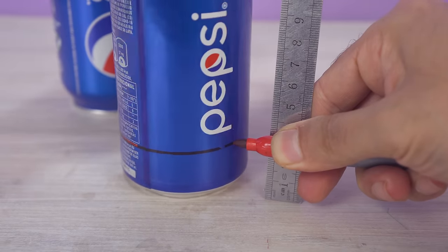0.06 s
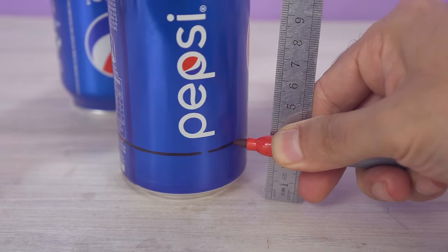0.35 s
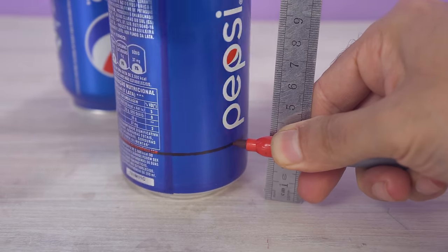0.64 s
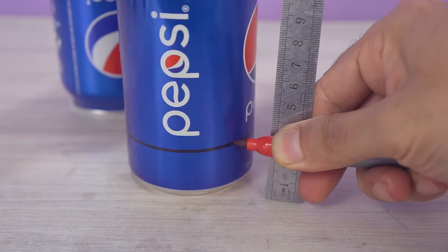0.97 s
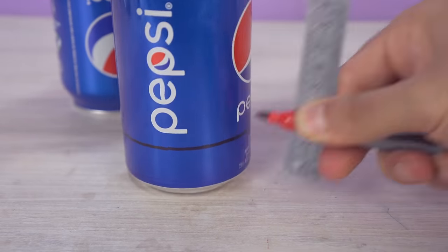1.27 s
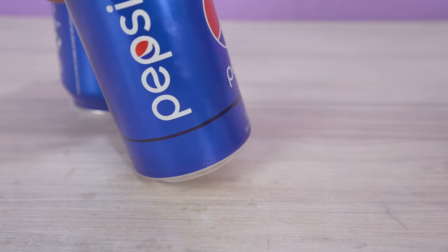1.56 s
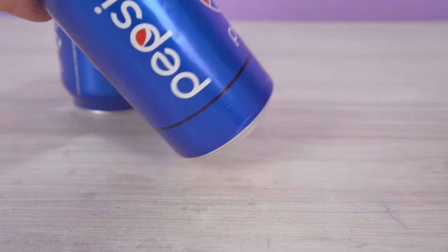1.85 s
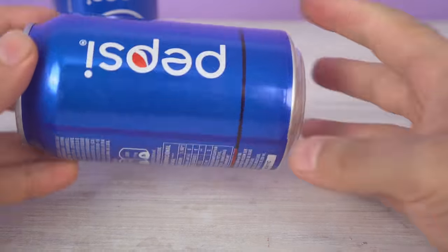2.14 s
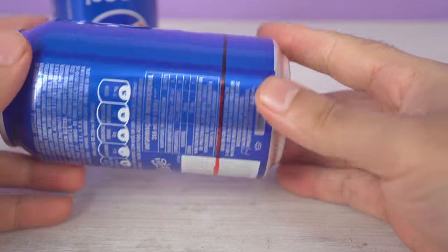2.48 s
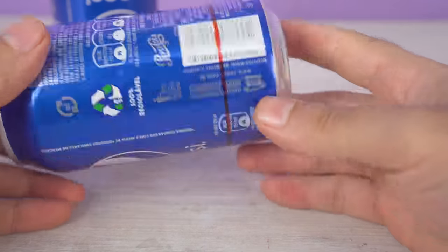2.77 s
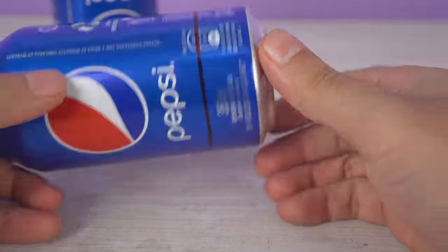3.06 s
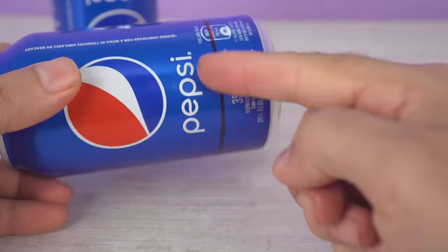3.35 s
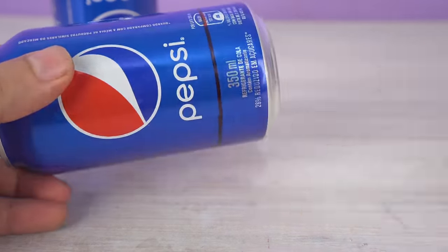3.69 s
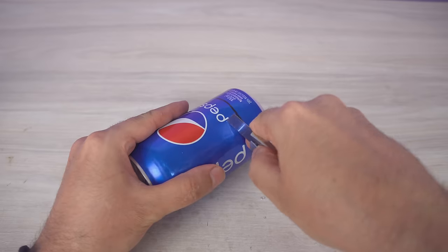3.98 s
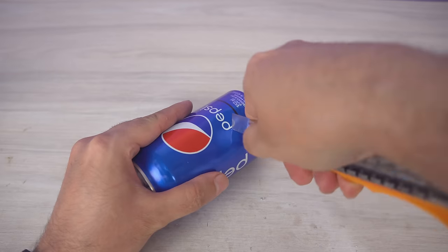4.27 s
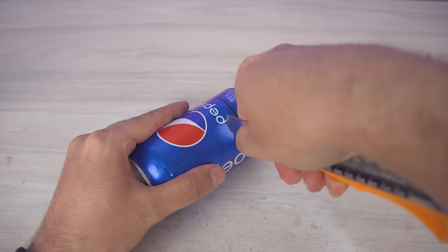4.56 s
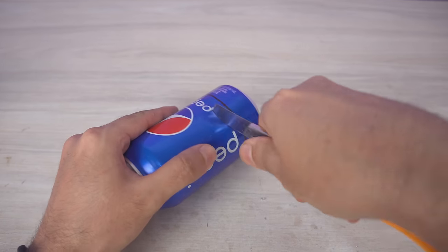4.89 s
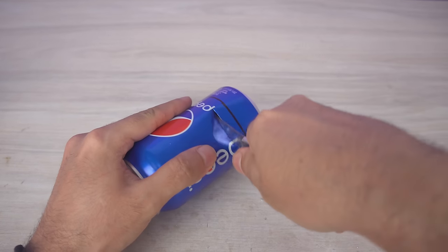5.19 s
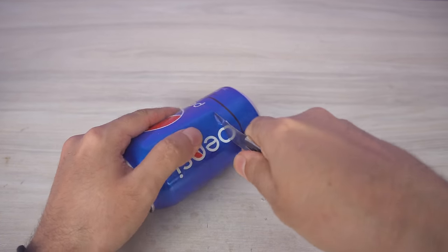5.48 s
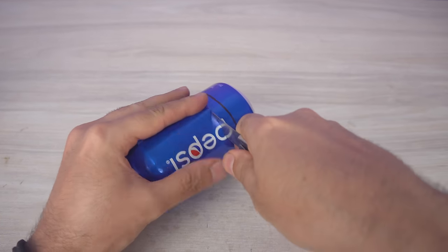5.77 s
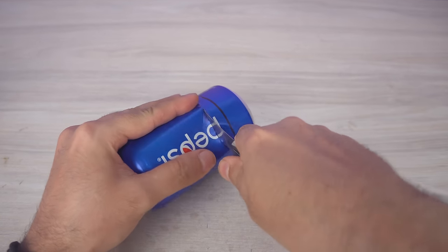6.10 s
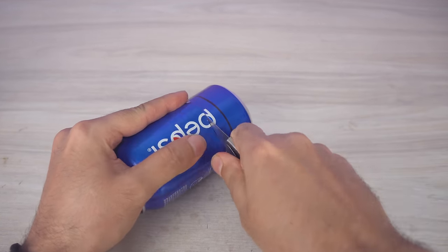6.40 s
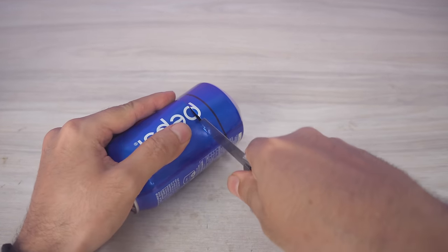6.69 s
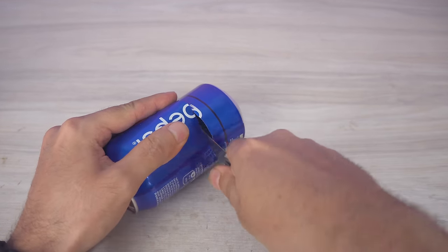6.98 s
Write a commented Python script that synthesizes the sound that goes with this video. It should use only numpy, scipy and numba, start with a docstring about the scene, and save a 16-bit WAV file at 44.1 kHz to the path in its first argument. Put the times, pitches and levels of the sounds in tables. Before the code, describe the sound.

Soft marker rubbing on a drink can, a loud crinkle, then a blade sawing through the thin metal with crackles and hollow rasps.

```python
"""Felt rubs softly on metal: an empty aluminium drink can is turned against a marker on a table.
It is lifted, and its wall buckles under the fingers with a loud crinkle. A utility knife pierces it
and saws round it: the blade judders, the thin sheet tears in sharp snaps, and the can answers with
a hollow note that rises and dulls as the slit opens. Small quiet room, heard from close by."""
import sys
import numpy as np
from scipy import signal
from scipy.fft import rfft, irfft
from scipy.io import wavfile
from scipy.ndimage import uniform_filter1d
from numba import njit

SR = 44100
rng = np.random.default_rng(int(sys.argv[2]) if len(sys.argv) > 2 else 0)


def file_out(sig):
    """Save sig as 16-bit WAV at sys.argv[1]."""
    # one column per channel
    cols = np.atleast_2d(sig).T
    # limit, then scale
    lim = np.clip(cols, -1, 1)
    pcm = np.round(lim * 32767).astype(np.int16)
    wavfile.write(sys.argv[1], SR, pcm)


N = 319284
TIME_S = np.arange(N) / SR

# twists of the can against the marker: (start [s], rise [s], hold [s], level [dB])
TWISTS = [(0.0, 0.0074, 0.012, -50), (0.16, 0.058, 0.13, -56.5), (.47, 0.12, 0.063, -50),
          (0.769, 0.027, 0.12, -49), (1.002, .03, 0.04, -55), (1.149, 0.022, 0.013, -57.5)]
# felt friction spectrum: (frequency [Hz], level [dB])
FELT_SPECTRUM = [(100, -2.5), (300, -4.5), (600, 0.5), (1100, -5), (2000, -8.5), (2600, -8.5),
                 (3100, -13.5), (3650, -13.5), (4600, -22.5), (6400, -21.5), (7300, -14.5), (8400, -28.5),
                 (11500, -29.5), (13000, -19), (16000, -31)]
# narrow high resonances colouring the rubbing and the tap: (pitch [Hz], rub gain [dB], tap level [dB])
RESONANCES = [(2470, -6, -43), (3380, 7, -56), (4360, 5.5, -76), (5370, -21, -51), (7140, -8, -54),
              (9300, -5, -63)]
# low rumble, dipping around 4.2 s: (time [s], level [dB])
RUMBLE_LEVELS = [(0, -64.5), (1.4, -62.5), (2.1, -66), (3.6, -67.5), (4.2, -82), (4.8, -67), (5.5, -66),
                 (6.1, -71), (7.24, -71.5)]
# low rumble spectrum: (frequency [Hz], level [dB])
RUMBLE_SPECTRUM = [(15, -7.5), (34, 7), (55, -6.5), (100, -9.5), (200, -15.5), (500, -51), (2000, -139)]
# finger slides: (time [s], length [s], level [dB], centre [Hz])
RUBS = [(0.02, 0.036, -48, 1860), (1.586, 0.074, -55.5, 1390), (1.96, 0.1, -55, 680),
        (2.087, .12, -62.5, 1000), (2.335, 0.062, -63, 1080), (2.641, 0.052, -56.5, 915),
        (3.517, 0.23, -66, 900), (3.907, 0.086, -56.5, 1110), (4.164, 0.096, -57.5, 1090)]
# buckles of the closed wall: (time [s], crack level [dB], treble re crack [dB])
CRINKLES = [(0.1622, -56.5, -28.5), (0.2199, -55.5, -27), (0.9934, -55, -18), (1.5771, -45.5, -1.5),
            (1.697, -27.5, 3), (1.7016, -22, -0.5), (1.728, -31, 6), (1.7343, -27, 1), (1.7585, -26, 1.5),
            (1.7878, -34, -4), (1.8541, -36.5, -7), (1.8878, -35, 1.5), (1.9734, -50, -9),
            (1.9817, -41.5, -7), (2.088, -53, -4), (2.2244, -47.5, -1.5), (2.6454, -50, -6),
            (3.3655, -68, 10), (3.523, -45.5, -5.5), (3.7902, -56.5, -7)]
# low, mid and treble bands of a click: (low edge [Hz], high edge [Hz], shimmer t60 [s])
CLICK_BANDS = [(950, 2500, 0.28), (2930, 7350, 0.17), (6430, 23300, 0.2)]
# ringing wall panels: (time [s], level [dB], pitch [Hz], t60 [s])
PANELS = [(4.898, -31, 3900, .03), (.82, -48.5, 3470, 0.13), (1.055, -52, 3360, 0.056),
          (1.6, -45, 1000, 0.095), (1.715, -36.5, 2400, 0.47), (1.728, -23, 8400, 0.16),
          (1.971, -43.5, 2600, 0.12), (3.471, -64, 7200, 1), (4.793, -36.5, 6440, 0.073),
          (4.996, -26, 5770, 0.22), (5.44, -35.5, 1950, 0.24), (6.514, -36.5, 1770, 0.29)]
# knocks through the table: (time [s], level [dB], centre [Hz], t60 [s])
THUDS = [(1.7, -43.5, 55, 0.17), (1.7, -40.5, 580, 0.4), (2.644, -55.5, 378, 0.17),
         (2.954, -50.5, 120, 0.07), (3.522, -42.5, 222, 0.019), (4.986, -36, 213, 0.014),
         (5.452, -39, 483, 0.076), (5.452, -50, 99, 0.045), (6.512, -54, 387, 0.26)]
# running buckles: (start [s], rise [s], hold [s], level [dB], tilt [dB/octave])
CRUMPLES = [(1.706, .012, 0.031, -29, -1), (4.978, 0.018, 0.022, -31.5, -3), (5.435, .006, 0.023, -32, -4),
            (6.509, .004, 0.023, -35, -5.5), (6.627, .004, 0.037, -41.5, -7)]
# crack shower spectrum before tilt: (frequency [Hz], level [dB])
CRUMPLE_SPECTRUM = [(100, -53), (300, -36), (1000, -13), (2300, -3), (5500, 4), (8500, 4.5), (12000, 2),
                    (15500, 1)]
# tears under the blade: (time [s], crack level [dB], treble re crack [dB], kick to the body [dB])
SNAPS = [(4.0191, -30.5, -12.5, -39), (4.4789, -47, -8, -34.5), (4.4844, -50, -10, -37),
         (4.6441, -52, -5, -43.5), (4.668, -48, -5, -34.5), (4.6966, -43.5, -7, -36),
         (4.7138, -59, -5, -37.5), (4.793, -32, -6, -41), (4.8985, -28.5, -12, -36),
         (4.946, -35, -17, -36.5), (4.9882, -23, -3.5, -28), (5.1206, -31, -5, -50), (5.192, -34, -12, -30),
         (5.2449, -48, -3, -34), (5.274, -33.5, -14, -30), (5.3465, -43, -16, -49), (5.3824, -40.5, 8, -54),
         (5.4361, -21, -10, -30), (5.4533, -24.5, -10, -36), (5.5397, -27.5, -21, -42.5),
         (5.5612, -34.5, -16, -32.5), (5.6391, -33.5, -3, -43.5), (5.648, -30.5, -16, -30),
         (5.6974, -29.5, -13, -39), (5.824, -48, -13, -56), (5.865, -44.5, -1, -57),
         (5.9301, -45.5, -20, -45.5), (5.943, -64, -8, -40.5), (6.0392, -27, -10, -35),
         (6.0644, -39, -4, -41), (6.071, -35, -15, -36), (6.1093, -54, -8, -39),
         (6.1501, -30.5, -18, -39.5), (6.1645, -24.5, -7, -32), (6.2148, -41.5, 5, -39),
         (6.238, -40, -11, -39), (6.3596, -43.5, 7.5, -39.5), (6.3985, -44, 9, -33.5),
         (6.4864, -56, -9, -46.5), (6.5065, -34, 8, -53), (6.5128, -28, 2.5, -38.5),
         (6.6348, -23.5, -4, -33.5), (6.69, -30, -25, -43), (6.828, -57, -17, -51.5),
         (6.9068, -43, 0.5, -31.5), (6.9644, -27.5, -17, -32.5), (6.9886, -24, -36, -32.5),
         (7.143, -52, -3, -39), (7.1561, -46.5, -24, -41), (7.1807, -35, -24, -62)]
# wall and air modes: (base pitch [Hz], base width [Hz], gain [dB], share of pitch shift [0-1])
BODY_MODES = [(634, 210, -5.5, 0.9), (720, 113, -7.5, 1), (815.7, 30, 2, 0.96), (833, 20, -8, 1),
              (876, 34, -16.5, 0.5), (1334, 31, -22.5, 0), (1650, 28, -41, 0.7), (1730, 50, -13, .1),
              (1975, 39, -6, 0.5), (2040, 30, -34, 0), (2964, 33, -12, 0.7), (3210, 30, -18, 0.04),
              (3140, 97, -14, 0)]
# slit opening as the hand works it: (time [s], gape [0-1])
SLIT_GAPE = [(5.0, 0.03), (5.25, 0.07), (5.7, 0.31), (6.2, 0.19), (6.4, 0.45), (6.95, 0.33), (7.2, 1)]
# sawing strokes: (start [s], rise [s], hold [s], hollow ring [dB], rasp [dB])
STROKES = [(4.483, 0.0029, 0.033, -35.5, -43), (4.62, 0.056, 0.018, -37.5, -43),
           (5.142, 0.035, 0.024, -34.5, -37.5), (5.243, 0.0063, 0.035, -40.5, -31.5),
           (5.45, 0.025, 0.018, -38, -59), (6.061, 0.017, .015, -48, -44),
           (6.204, 0.027, 0.0051, -44.5, -40), (6.522, 0.013, 0.021, -44, -45),
           (6.629, 0.012, 0.081, -45.5, -46), (6.915, 0.055, 0.041, -34, -30),
           (7.014, 0.018, 0.023, -39.5, -37.5), (7.134, 0.013, 0.032, -49.5, -54)]
# blade rasp spectrum: (frequency [Hz], level [dB])
RASP_SPECTRUM = [(450, -28), (780, 11.5), (1100, 3.5), (1700, 8), (2400, -2), (3100, -4.5), (4500, 0.5),
                 (6500, 1), (9000, -14.5), (16000, -18)]
# room decay: (low edge [Hz], high edge [Hz], t60 [s])
ROOM_BANDS = [(147, 880, 0.48), (676, 1240, 0.19), (2260, 3550, 0.3), (6530, 25000, 0.34)]
# background hiss spectrum: (frequency [Hz], level [dB])
HISS_SPECTRUM = [(24, -27), (40, -5), (269, -2), (615, -8.5), (790, -14), (1370, -13), (2440, -19),
                 (6300, -19), (7300, -20), (8500, -17.5), (13800, -25), (16000, -27.5)]
# faint low stereo spread of the tail: (frequency [Hz], gain [dB])
TAIL_SPREAD = [(60, -22), (200, -28), (500, -52), (1300, -75), (5000, -85), (14000, -75)]
# faint stereo hiss: (frequency [Hz], level [dB])
STEREO_HISS_SPECTRUM = [(18, -52), (30, -19), (122, -4), (190, -4), (497, -5), (645, -6.5), (859, -6.5),
                        (8040, -12), (15000, -20)]


def amp(db):
    """Decibels to gain."""
    return 10 ** (np.asarray(db) / 20)


def unit_rms(x):
    """Scales to an rms of one."""
    return x / np.sqrt(np.mean(x ** 2) + 1e-20)


def steady(x, samples):
    """Holds the running rms at one."""
    return x / np.sqrt(abs(uniform_filter1d(x ** 2, samples)) + 1e-12)


def add(mix, start_s, sound):
    """Mixes a sound in at start_s."""
    part = mix[max(round(start_s * SR), 0):][:len(sound)]
    part += sound[:len(part)]


def band(x, lo_hz, hi_hz, order=2):
    """Causal band-pass."""
    sos = signal.butter(order, [lo_hz, min(hi_hz, .47 * SR)], "band", fs=SR, output="sos")
    return signal.sosfilt(sos, x)


def shaped(x, curve):
    """Filters by a curve of (frequency [Hz], gain [dB])."""
    hz, db = np.transpose(curve)
    bins_hz = np.fft.rfftfreq(len(x), 1 / SR)
    gain_db = np.interp(np.log(bins_hz + 1), np.log(hz), db)
    return irfft(rfft(x) * amp(gain_db), len(x))


def coloured(x, spectrum):
    """Shapes the spectrum, at unit rms."""
    return unit_rms(shaped(x, spectrum))


def noise(shape):
    """White noise."""
    return rng.standard_normal(shape)


def wander(length, span):
    """Unit-rms random drift, smooth over span points."""
    return unit_rms(uniform_filter1d(uniform_filter1d(noise(length), span), span))


def slips(per_s, spread_db):
    """Stick-slip: random jerks, mostly small, a few large."""
    jerks = amp(spread_db * np.minimum(rng.exponential(1, N), 3.5)) * rng.choice([-1, 1], N)
    return unit_rms(jerks * (rng.random(N) < per_s / SR))


def effort_db(start_s, rise_s, hold_s, onset_db, fall_db_per_s):
    """One push of the hand re its peak: builds, holds, dies away."""
    t = TIME_S - start_s
    build_db = onset_db * np.clip(1 - t / max(rise_s, .001), 0, 1)
    fall_db = fall_db_per_s * np.maximum(t - rise_s - hold_s, 0)
    return np.where(t < 0, -200, build_db - fall_db)


def resonance(x, hz, q=31):
    """One narrow resonance."""
    return signal.lfilter(*signal.iirpeak(hz, q, fs=SR), x)


def marker():
    """Friction of felt and can base swells with each twist, coloured by narrow high resonances."""
    grains = slips(per_s=2400, spread_db=3.5) + 0.75 * noise(N)
    uneven_db = 1.8 * wander(N, span=300) - 0.64
    twists_db = [db + effort_db(*timing_s, onset_db=-8.5, fall_db_per_s=155) for *timing_s, db in TWISTS]
    friction = amp(np.max(twists_db, axis=0) + uneven_db) * coloured(grains, FELT_SPECTRUM)
    return friction + sum(amp(db) * resonance(friction, hz) for hz, db, _ in RESONANCES)


def rumble():
    """Low rumble, dipping around 4.2 s."""
    level_db = np.interp(TIME_S, *np.transpose(RUMBLE_LEVELS)) + 2 * wander(N, span=2000)
    return amp(level_db) * coloured(noise(N), RUMBLE_SPECTRUM)


def finger_rubs(edge_ratio=2.4):
    """Skin slides on the can in swells of band noise."""
    t, out = np.arange(SR // 2) / SR, np.zeros(N)
    for start_s, length_s, db, hz in RUBS:
        age = 4 * t / length_s
        friction = unit_rms(band(noise(len(t)), hz / edge_ratio, hz * edge_ratio))
        add(out, start_s, amp(db) * age * np.exp(1 - age) * friction)
    return out


def crack(envelope, lo_hz, hi_hz, q=5):
    """Unit-energy burst; the patch of sheet that gives way has its own pitch."""
    burst = noise(len(envelope)) * envelope
    patch_hz = lo_hz * (hi_hz / lo_hz) ** rng.uniform(.1, .75)
    sound = band(burst + 1.06 * resonance(burst, patch_hz, q), lo_hz, hi_hz)
    return sound / np.linalg.norm(sound)


def clicks(rows, top_hz, decay_s, shimmer_db, patchy_db, grain_db, bounce_s=0.00088):
    """Cracks bounce off the table; dense wall modes shimmer on. Rows: (time [s], 3 band levels [dB])."""
    size = 2 ** 14
    t, out = np.arange(size) / SR, np.zeros(N)
    bins = size // 2 + 1
    dents = np.array([wander(bins, span=60) for _ in rows])  # each dent detunes the wall
    wall_gains = amp(patchy_db * 2 * np.tanh((wander(bins, span=12) + dents) / 2))
    bounce = 0.21 * (t > bounce_s) * np.exp(-abs(t - bounce_s) / decay_s)
    envelope = np.exp(-t / decay_s) + bounce
    attack = 1 - np.exp(-t / 0.00033)
    layers = []
    for lo_hz, hi_hz, t60_s in CLICK_BANDS:
        hi_hz = min(hi_hz, top_hz)
        cracks = np.sqrt(.003 * SR) * np.array([crack(envelope, lo_hz, hi_hz) for _ in rows])
        wall = irfft(rfft(noise((len(rows), size))) * wall_gains)
        shimmer = unit_rms(band(wall, lo_hz, hi_hz)) * attack * amp(-60 * t / t60_s)
        layers.append((cracks, shimmer))
    hardest_db = max(max(levels_db) for _, *levels_db in rows)
    for k, (start_s, *levels_db) in enumerate(rows):
        # harder cracks shake the wall more than in proportion
        shake_db = shimmer_db + 0.071 * (max(levels_db) - hardest_db)
        shake = amp(shake_db) * unit_rms(amp(grain_db * wander(size, span=50)))
        for db, (cracks, shimmer) in zip(levels_db, layers):
            add(out, start_s, amp(db) * (cracks[k] + shake * shimmer[k]))
    return out


def crinkling():
    """The closed wall buckles under the fingers; duller cracks gain low mids."""
    rows = [(start_s, db - 16 - treble_db, db, db + treble_db) for start_s, db, treble_db in CRINKLES]
    return clicks(rows, top_hz=14800, decay_s=.0013, shimmer_db=-7.5, patchy_db=7, grain_db=3)


def panels(half_width=0.13):
    """Narrow clusters of wall modes ring on after a buckle or rub."""
    t, out = np.arange(SR // 2) / SR, np.zeros(N)
    for start_s, db, hz, t60_s in PANELS:
        cluster = band(noise(len(t)), hz * (1 - half_width), hz * (1 + half_width))
        add(out, start_s, amp(db - 60 * t / t60_s) * unit_rms(cluster))
    return out


def handling():
    """Skin faintly brushes the wall as the can turns in the hands."""
    in_hand = uniform_filter1d(1. * (TIME_S > 1.27) * (TIME_S < 3.72), size=2000)
    level_db = -74.5 + 3.5 * wander(N, span=1300)
    friction = coloured(slips(per_s=1500, spread_db=3.5), FELT_SPECTRUM)
    whisper = np.diff(friction, prepend=0)  # light contact is brighter than felt
    return in_hand * amp(level_db) * unit_rms(band(whisper, 280, 11000))


def tap(start_s=1.5774, t60_s=0.18):
    """Fingertips land on the can: a ping of narrow high resonances."""
    t, out = np.arange(SR // 2) / SR, np.zeros(N)
    for hz, _, db in RESONANCES:
        add(out, start_s, amp(db - 60 * t / t60_s) * unit_rms(resonance(noise(len(t)), hz)))
    return out


def table_thuds():
    """A soft knock shoves the air once; the table top hums on."""
    t, out = np.arange(SR // 2) / SR, np.zeros(N)
    for start_s, db, hz, t60_s in THUDS:
        phase_rad = 2 * np.pi * hz * t
        shove = band(4 * (1 - phase_rad) * np.exp(-phase_rad), hz / 4, hz * 3)
        hum = amp(-60 * t / t60_s) * unit_rms(band(noise(len(t)), hz / 1.96, hz * 1.44))
        add(out, start_s, amp(db) * (shove + hum))
    return out


def crumpling(patchy_db=2):
    """A large buckle runs on as a shower of tiny cracks, coloured by dense wall modes."""
    size, out = 2 ** 14, np.zeros(N)
    grains = slips(per_s=3500, spread_db=3)
    for start_s, rise_s, hold_s, db, tilt_db_per_oct in CRUMPLES:
        now = slice(round(start_s * SR), round(start_s * SR) + size)
        wall = irfft(rfft(grains[now]) * amp(patchy_db * wander(size // 2 + 1, span=25)))
        spectrum = [(hz, base_db + tilt_db_per_oct * np.log2(hz)) for hz, base_db in CRUMPLE_SPECTRUM]
        shower = steady(coloured(wall, spectrum), samples=500)
        push_db = effort_db(start_s, rise_s, hold_s, onset_db=-6, fall_db_per_s=288)[now]
        add(out, start_s, amp(db + push_db) * shower)
    return out


@njit
def ring(push, pole):
    """One damped mode; pitch and decay may change every sample."""
    out, state = np.zeros(len(push)), 0j
    for i in range(len(push)):
        state = state * pole[i] + push[i]
        out[i] = state.imag
    return out


def can_body(push):
    """Hollow modes rise and die sooner as the slit opens, and waver as the wall flexes."""
    gape = np.clip(np.interp(TIME_S, *np.transpose(SLIT_GAPE)), 0, 1)
    pitch_shift = 0.42 * gape - 0.03
    loss_factor = 0.84 + 9 * gape
    out = np.zeros(N)
    for base_hz, width_hz, db, share in BODY_MODES:
        flex = 0.014 * loss_factor * wander(N, span=700)
        pitch_hz = base_hz * (1 + share * (pitch_shift + flex))
        pole = np.exp((2j * np.pi * pitch_hz - np.pi * width_hz * loss_factor) / SR)
        out += amp(db) * ring(push, pole)
    return band(out, 677, 15000, order=4)  # too small to radiate bass


def tearing():
    """The sheet snaps under the blade; each snap kicks the hollow body."""
    kicks, rows = np.zeros(N), []
    for start_s, db, treble_db, kick_db in SNAPS:
        add(kicks, start_s, amp([kick_db]))
        rows.append((start_s, kick_db, db, db + treble_db))
    snaps = clicks(rows, top_hz=16100, decay_s=.0008, shimmer_db=-10.5, patchy_db=5, grain_db=1)
    return snaps + amp(2) * can_body(kicks)


def sawing(judder_db=4):
    """The blade jerks along the slit, rasping and ringing the body as hard as the hand pushes."""
    hollow_gain, rasp_gain = np.zeros((2, N))
    for *timing_s, hollow_db, rasp_db in STROKES:
        push_db = effort_db(*timing_s, onset_db=-14, fall_db_per_s=275)
        hollow_gain = np.maximum(hollow_gain, amp(hollow_db + push_db))
        rasp_gain = np.maximum(rasp_gain, amp(rasp_db + push_db))
    jerks = slips(per_s=740, spread_db=4.5) + 0.57 * noise(N)
    judder = amp(judder_db * np.tanh(wander(N, span=300)))
    hollow = amp(-2.5) * hollow_gain * steady(can_body(jerks), samples=800)
    rasp = amp(-4) * rasp_gain * steady(coloured(jerks, RASP_SPECTRUM), samples=800)
    return judder * (hollow + rasp)


def catching(per_s=11):
    """In the slit, the blade catches at random: a tick and a light kick to the body."""
    in_slit = TIME_S > STROKES[0][0]
    catches = in_slit * (rng.random(N) < per_s / SR) * rng.uniform(0.63, 1.6, N)
    t = np.arange(SR // 50) / SR
    tick = coloured(noise(len(t)), RASP_SPECTRUM) * np.exp(-t / .002)
    return amp(-49) * can_body(catches) + amp(-52) * signal.oaconvolve(catches, tick)[:N]


def room(x, delay_s=.006):
    """Short diffuse tail, longest in the lows."""
    t = np.arange(SR // 2) / SR
    tail = sum(band(noise(len(t)), *edges_hz) * amp(-60 * t / t60_s) for *edges_hz, t60_s in ROOM_BANDS)
    tail *= t > delay_s
    return signal.fftconvolve(x, tail / np.linalg.norm(tail))[:N]


def scene():
    """All sources centred, with faint stereo hiss and a faint low stereo spread of the tail."""
    sheet = crinkling() + tearing() + crumpling() + panels()
    blade = sawing() + catching()
    direct = sheet + blade + tap() + marker() + handling() + rumble() + finger_rubs() + table_thuds()
    mid = direct + amp(-11) * room(direct) + amp(-65.5) * coloured(noise(N), HISS_SPECTRUM)
    side = shaped(room(direct), TAIL_SPREAD) + amp(-73.5) * coloured(noise(N), STEREO_HISS_SPECTRUM)
    return np.array([mid + side, mid - side])


def record(dry):
    """Steep low-pass at 16.1 kHz."""
    taps = signal.firwin(511, 16100, window=("kaiser", 9), fs=SR)
    return signal.oaconvolve(dry, taps[None], "same")


dry = scene()
out = record(dry)
file_out(out)
```